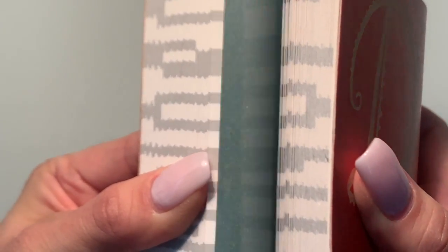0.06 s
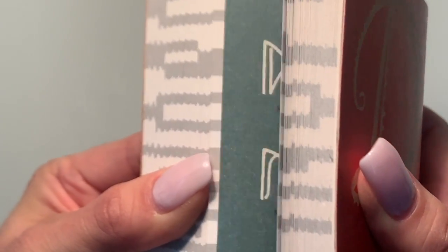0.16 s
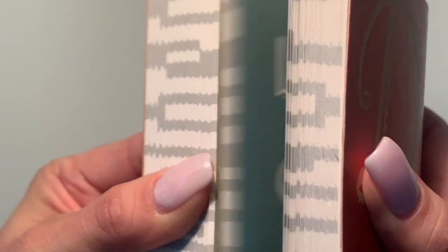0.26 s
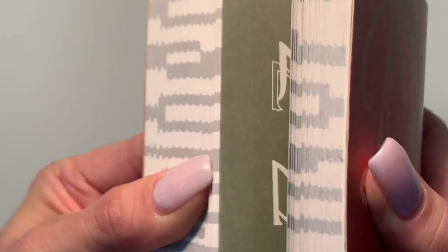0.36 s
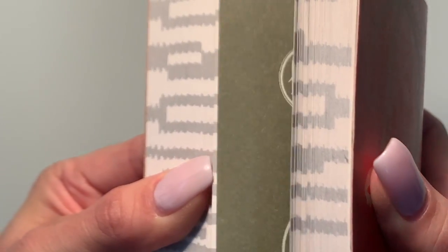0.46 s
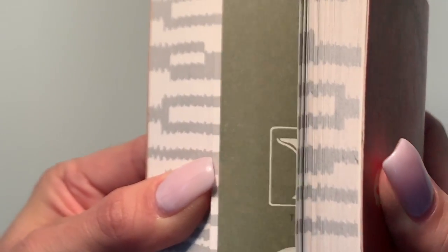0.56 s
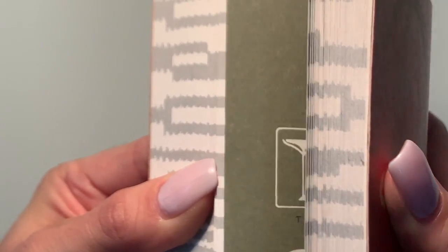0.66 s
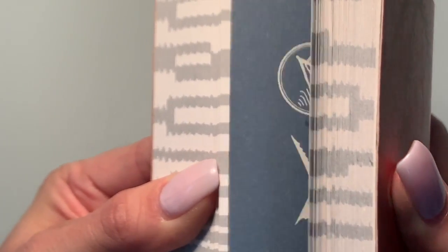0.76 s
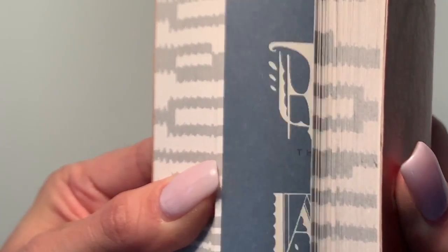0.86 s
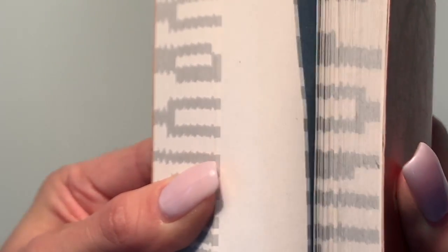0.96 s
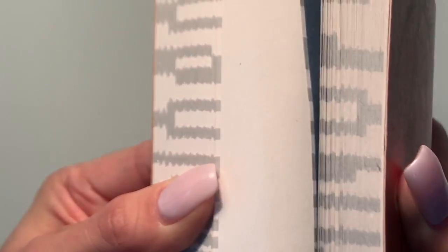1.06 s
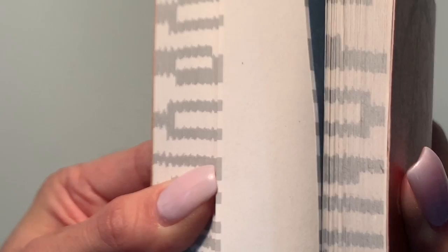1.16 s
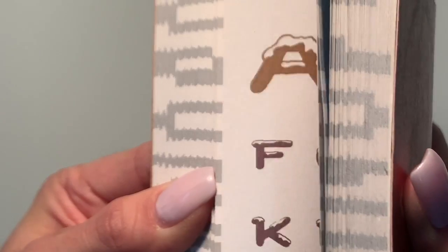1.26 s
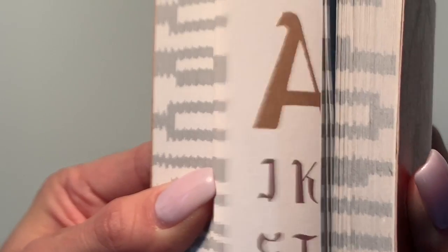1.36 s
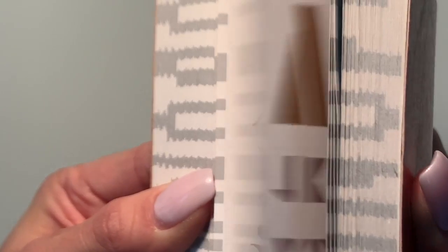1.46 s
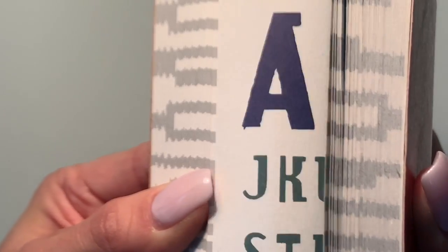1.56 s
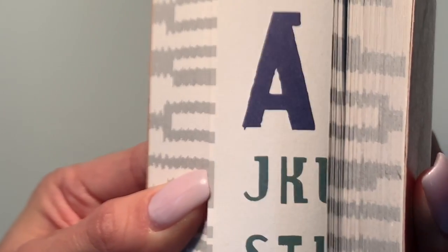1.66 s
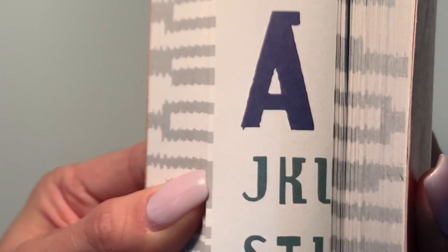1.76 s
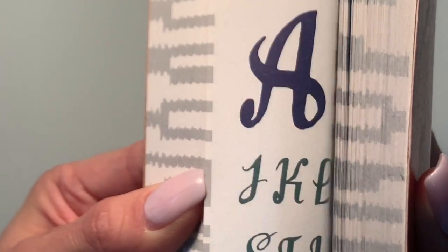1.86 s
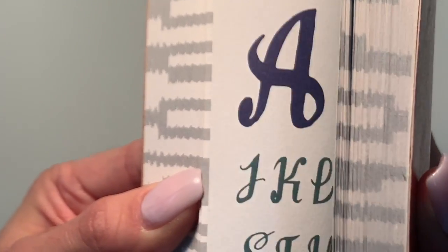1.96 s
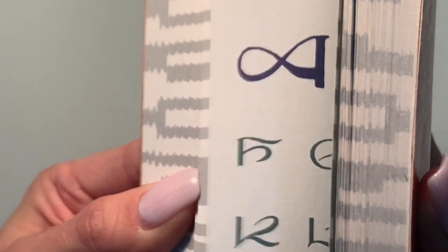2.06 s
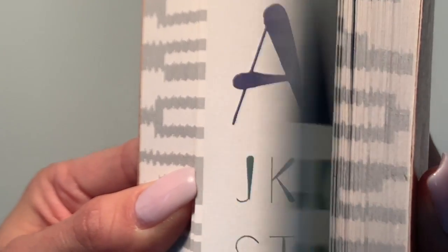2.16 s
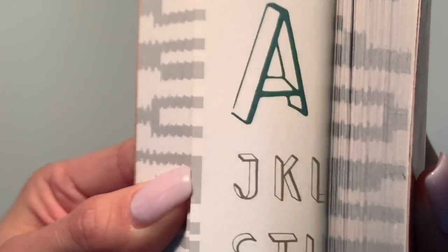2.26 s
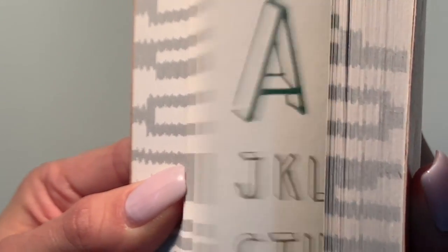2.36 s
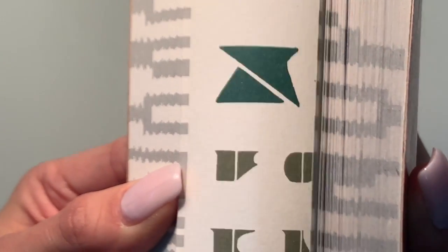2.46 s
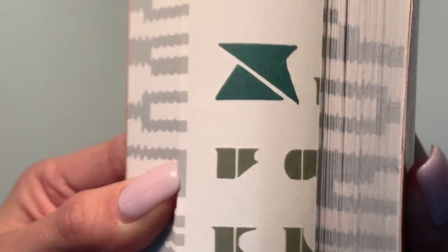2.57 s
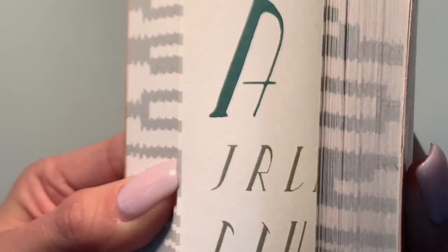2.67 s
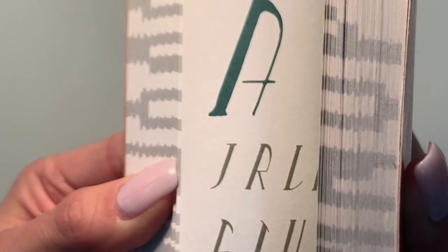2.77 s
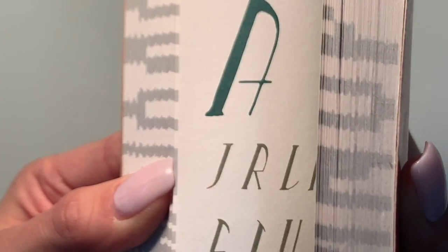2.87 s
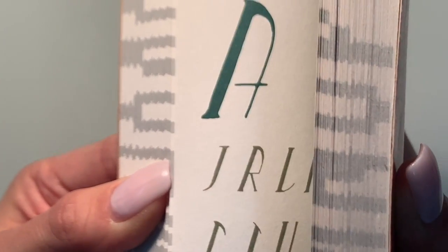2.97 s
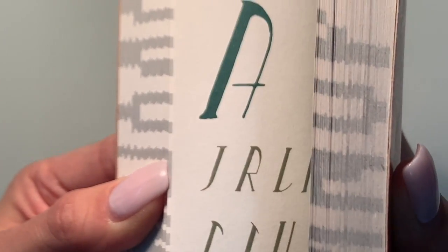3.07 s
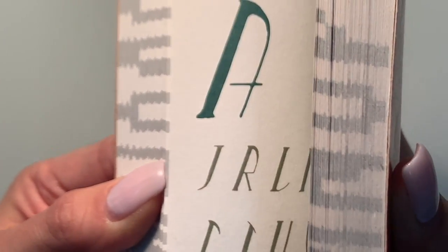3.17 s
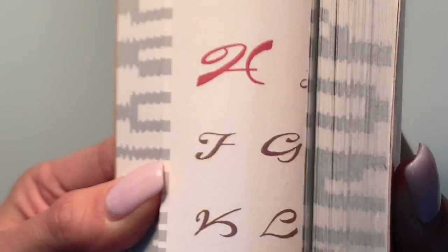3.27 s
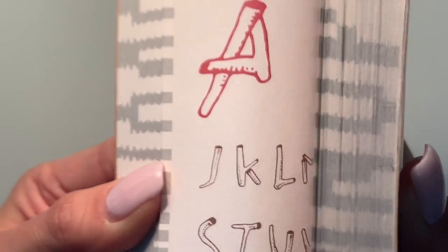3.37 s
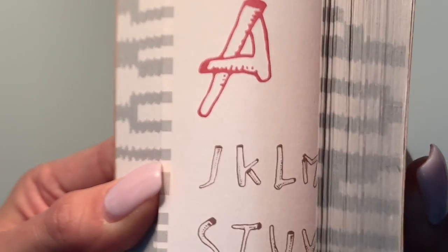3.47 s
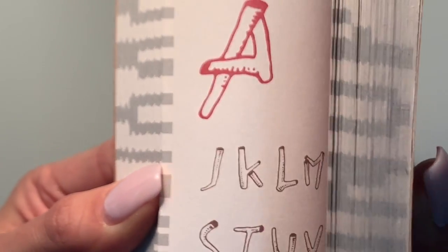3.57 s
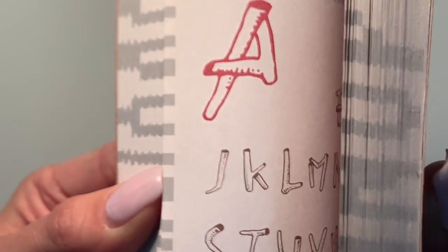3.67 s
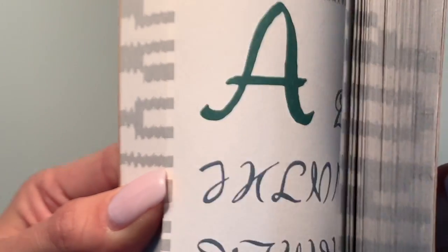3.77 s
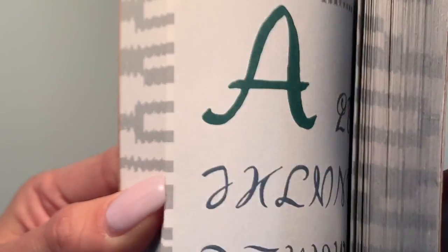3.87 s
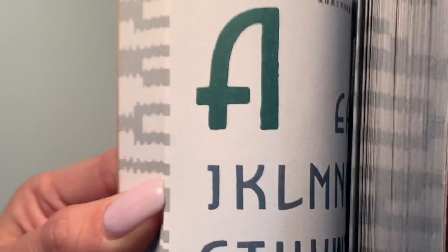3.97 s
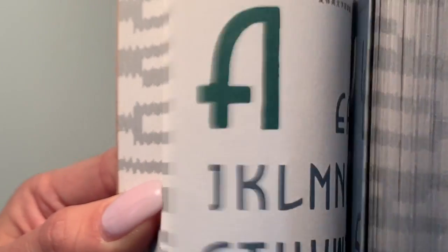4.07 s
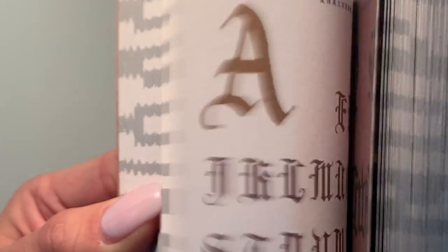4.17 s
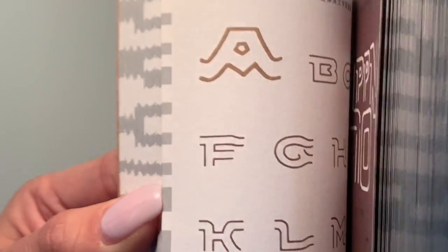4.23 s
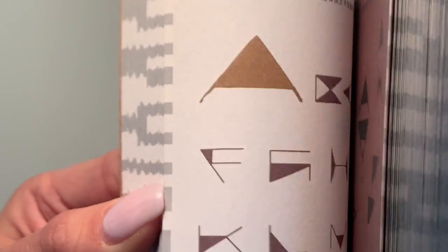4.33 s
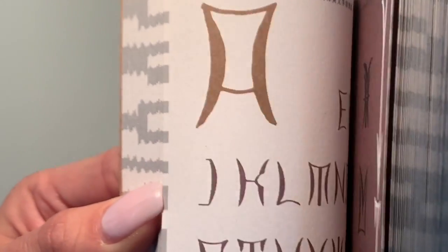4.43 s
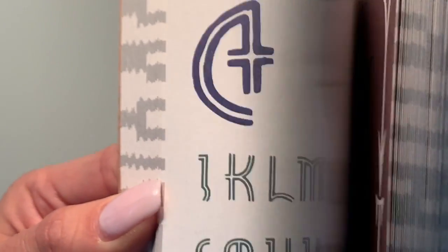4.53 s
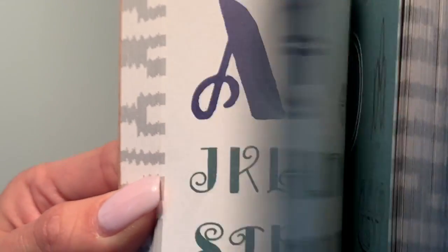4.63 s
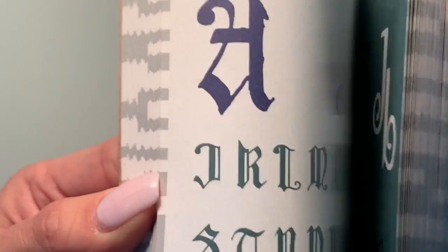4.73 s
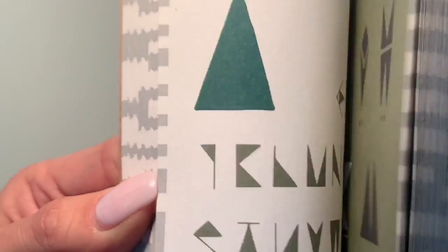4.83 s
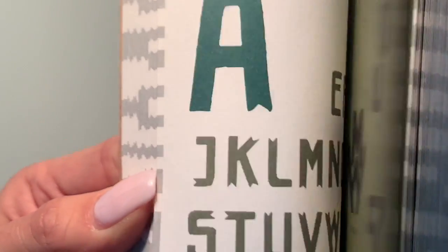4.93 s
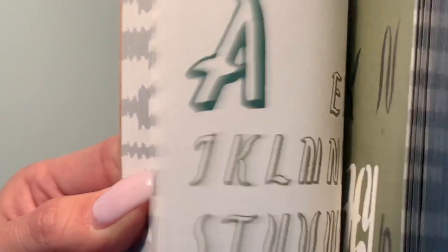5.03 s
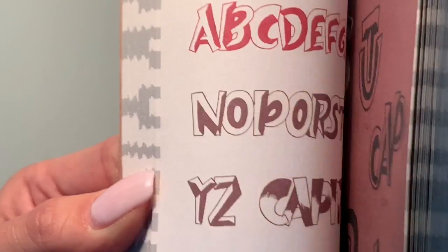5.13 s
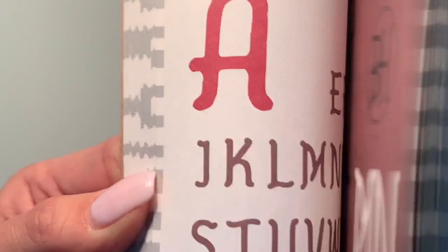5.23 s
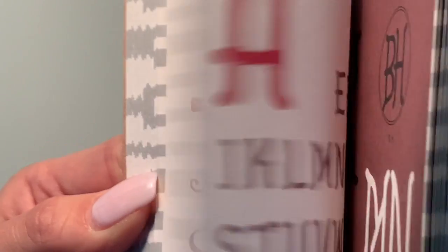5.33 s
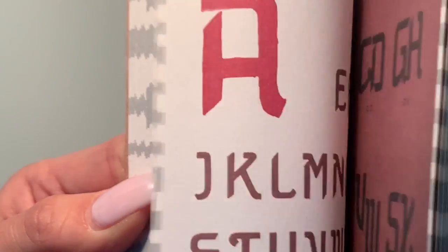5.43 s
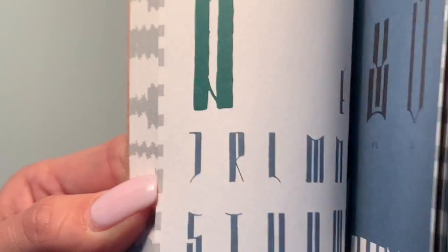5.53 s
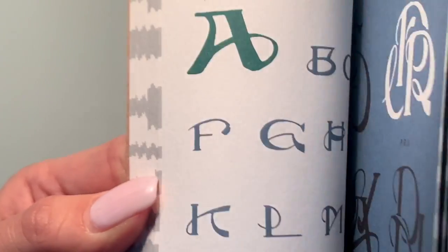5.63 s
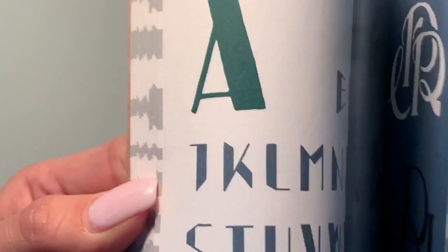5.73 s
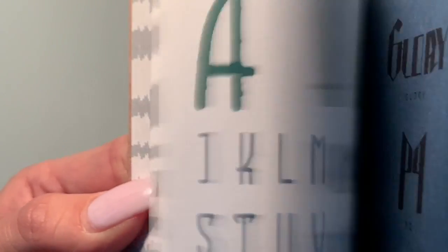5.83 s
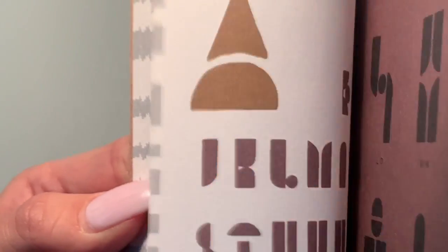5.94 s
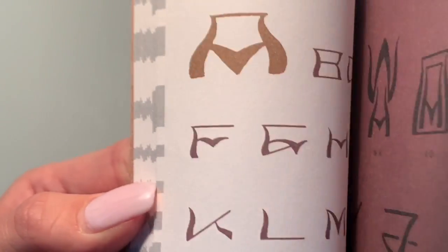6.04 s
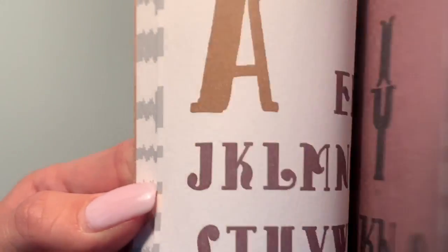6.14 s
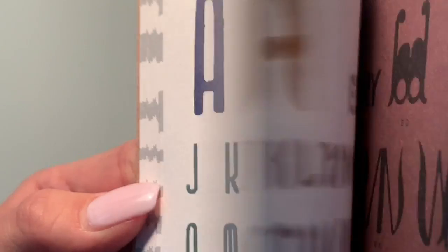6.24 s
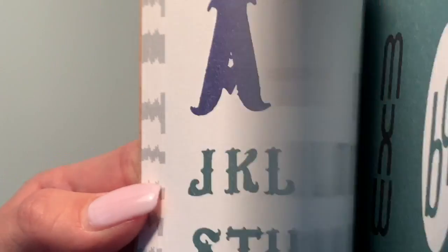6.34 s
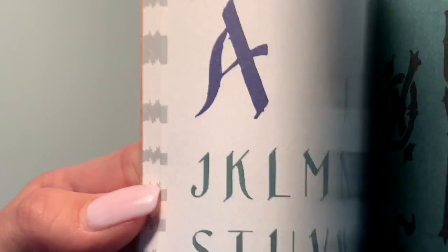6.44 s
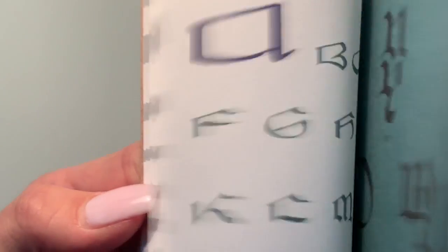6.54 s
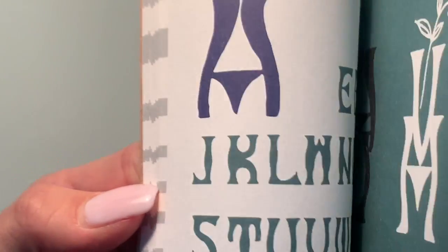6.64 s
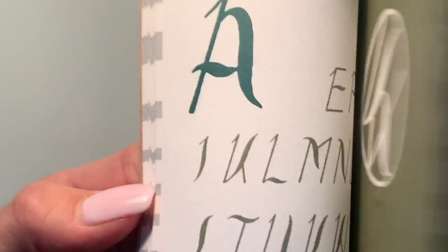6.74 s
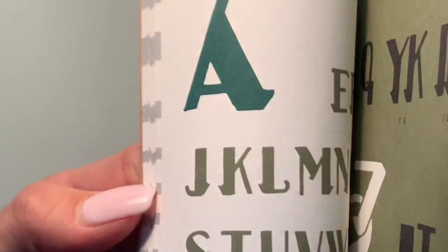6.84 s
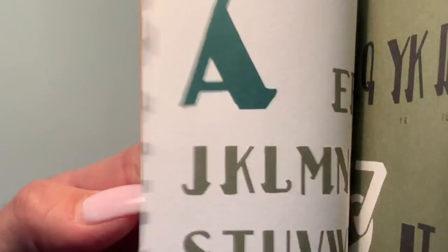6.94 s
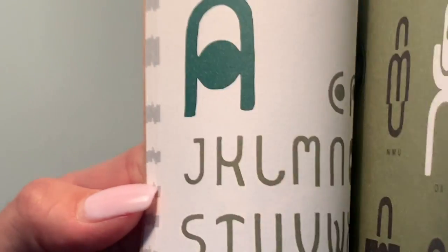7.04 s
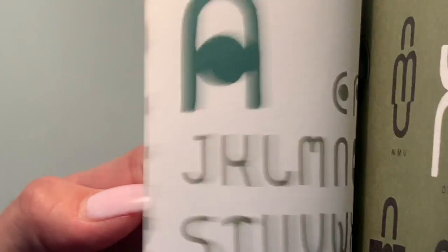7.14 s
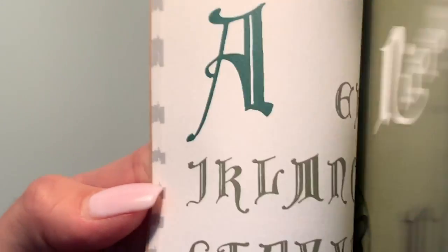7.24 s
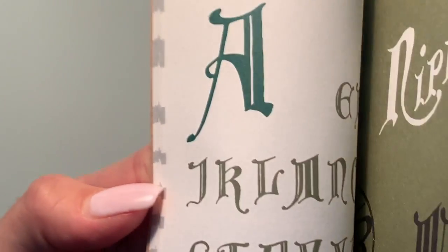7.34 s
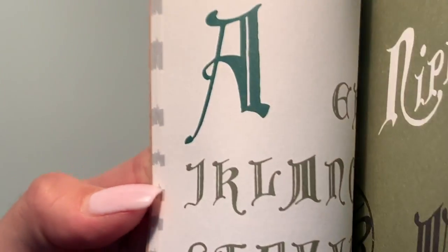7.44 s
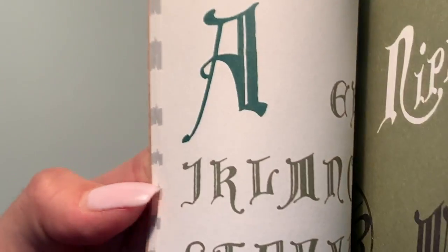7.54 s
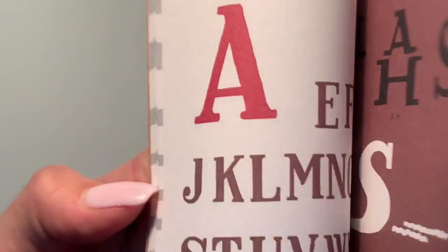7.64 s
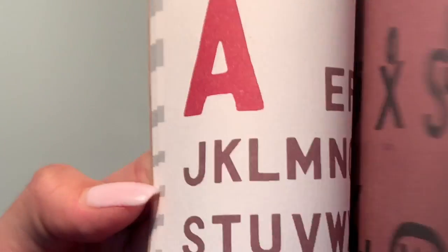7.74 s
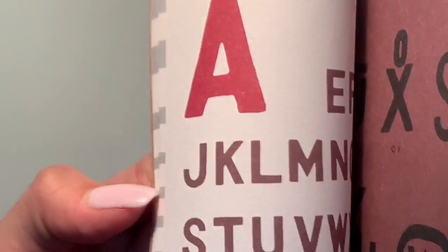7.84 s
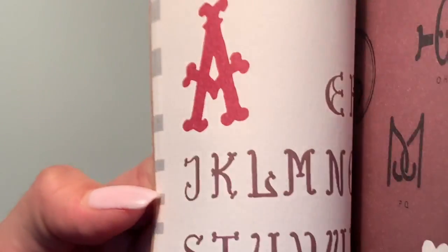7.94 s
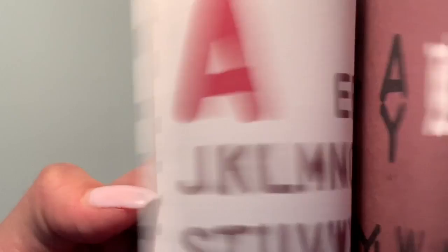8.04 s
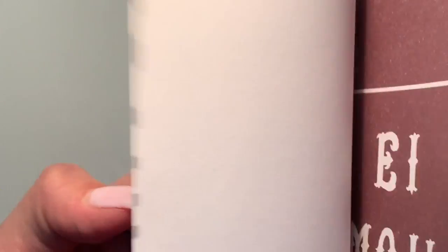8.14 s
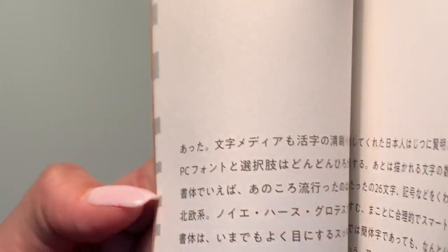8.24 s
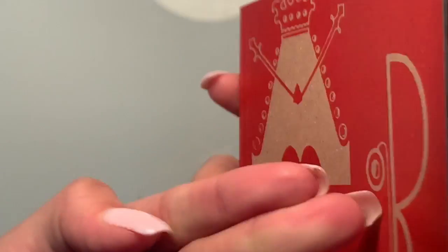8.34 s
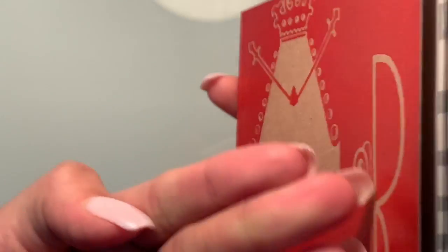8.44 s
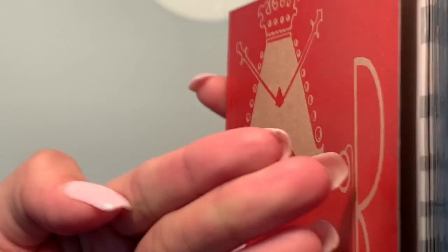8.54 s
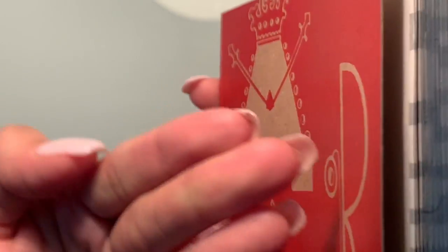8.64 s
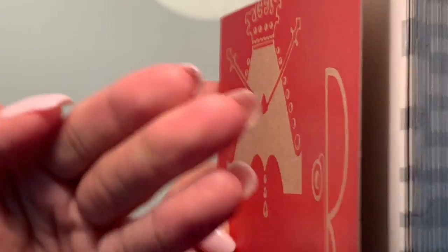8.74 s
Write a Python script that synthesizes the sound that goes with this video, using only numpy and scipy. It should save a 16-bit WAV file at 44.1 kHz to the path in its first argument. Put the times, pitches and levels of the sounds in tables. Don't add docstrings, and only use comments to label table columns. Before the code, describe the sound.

Very close in a quiet small room, a thumb lets pages of a thick soft-cover book slip away unevenly. Each scrapes, snaps and slaps the stack with a short papery rustle. Low grip thuds come near two and a half and three and a half seconds, then the flicking grows louder and busier. Near the end the book claps shut with a boomy thump, and the paper brushes briefly into stillness.

```python
import sys
import numpy as np
from scipy import signal
from scipy.fft import rfft, irfft, next_fast_len
from scipy.io import wavfile
from scipy.ndimage import uniform_filter1d

SR = 44100
rng = np.random.default_rng(int(sys.argv[2]) if len(sys.argv) > 2 else 0)


def waveform_to_disk(signal):
    frames = np.transpose(np.atleast_2d(signal))
    scaled = np.clip(frames, -1, 1) * 32767
    samples = np.round(scaled).astype(np.int16)
    wavfile.write(sys.argv[1], SR, samples)


def level_to_linear(level):
    exponent = np.asarray(level, float) / 20
    return 10 ** exponent


N = 388080

# frequency in Hz, level in dB per Hz.
ROOM_TONE = [(18, -38), (30, -8), (55, 5), (81, -25), (174, -9.5), (364, -31), (1500, -40.5), (2900, -39.5),
             (4500, -42.5), (6200, -52), (8740, -52), (13300, -44.5), (16000, -70)]
ROOM_TONE_DB = -61.5
# time in seconds, level in dB.
AIR_LEVEL = [(0, -53), (1.85, -61), (2.05, -47), (2.45, -53), (2.7, -75), (3.3, -53.5), (4.1, -59),
             (4.8, -56), (6, -58.5), (7.6, -67), (8.31, -65), (8.4, -39), (8.55, -65)]
FAN_DB, FAN_DELAY_S = 7.5, 0.0034

# release in seconds, slap in
# dB, edge hiss in dB over slap, lead of the catch in ms, catch in dB.
CAUGHT = [(0.042, -43.5, -10, 13.5, -43), (0.0892, -42, -1.5, 9.8, -42),
          (0.1464, -42.5, -3.5, 16.8, -41.5), (0.2373, -43.5, -7, 11.3, -39.5),
          (0.2995, -43, -14, 9.7, -44.5), (0.3465, -46, 3, 4.8, -42.5), (0.4108, -47.5, -1, 4.3, -42),
          (0.499, -44, -1, 11, -47.5), (0.6196, -44.5, 1.5, 14.5, -38.5),
          (0.7156, -41.5, -8, 17.8, -44.5), (0.7989, -49, -2.5, 9.6, -40.5),
          (0.9247, -42, 0, 17.2, -43), (0.9447, -39, -18.5, 12.7, -41),
          (1.155, -43.5, 1.5, 19.2, -42), (1.2657, -42, -1.5, 25.4, -45.5),
          (1.342, -37.5, -4, 33, -42.5), (1.407, -37, -4.5, 21, -43),
          (1.4946, -39.5, -1.5, 38, -46.5), (1.5596, -40, -4.5, 34, -46.5),
          (1.677, -44, 6, 47, -44.5), (1.8721, -34.5, -11.5, 57.3, -49),
          (2.0256, -35.5, -8.5, 67, -47.5), (2.4019, -36, -6.5, 49, -55),
          (2.622, -39.5, -13, 17.2, -42.5),
          (3.2598, -35, -15, 9.2, -32), (3.3781, -29, -2, 13, -38.5), (3.7275, -32.5, -8, 12.6, -41.5),
               (3.925, -37.5, -2.5, 10, -33.5), (4.1242, -39, -5, 7.2, -43.5),
               (4.2153, -35.5, -6, 7.7, -35), (4.308, -37.5, 1, 33.8, -41),
               (4.4013, -35.5, -5.5, 19.5, -39.5), (4.5609, -34.5, -3, 11.3, -36.5),
               (4.6564, -38.5, 0, 42.2, -37.5), (4.7456, -38, 2.5, 17, -42), (4.8211, -39.5, 0, 27, -40.5),
               (4.834, -39.5, -6, 6.4, -40.5), (4.888, -35.5, -2, 11.4, -41.5),
               (4.935, -36.5, -0.5, 6.3, -38), (4.9957, -33, -1, 7.3, -37.5), (5.0758, -38, 4, 11, -39.5),
               (5.1167, -35.5, 3, 5.5, -40.5), (5.2444, -34.5, -4, 6.5, -42),
               (5.2206, -37.5, 1.5, 13.3, -40), (5.4212, -34, -1, 7.7, -40.5), (5.6201, -35.5, -16, 6, -47),
               (5.876, -36.5, -3.5, 7, -49), (6.0176, -35.5, -3, 7.3, -48)]
# time in seconds, slap in dB,
# rustle in dB over slap, edge hiss in dB over slap.
FREE = [(0.4179, -45, 8, -5), (0.555, -43.5, 1, -2.5), (.5629, -43.5, 6.5, 0.5),
        (0.728, -42, 7, -3.5), (0.8127, -39.5, 7, -1), (0.8234, -43, 4, -3), (0.83, -42, -2.5, 0),
        (0.836, -43.5, 0, -3.5), (0.932, -50.5, -3, -5), (0.9525, -43, 6, 3), (1.334, -49, -5.5, -7),
        (1.555, -50.5, 1.5, 6.5), (3.7216, -35.5, 6.5, -2), (1.5787, -31, -0.5, -10),
        (2.109, -37, -0.5, -5), (2.1841, -36, -1.5, -6.5), (2.2737, -35.5, -3.5, -9.5),
        (2.419, -38.5, 1.5, -5), (2.431, -35, -0.5, -7), (3.6448, -41, -0.5, 5),
        (3.7335, -37, 5.5, -5.5), (3.8538, -43.5, 3.5, 5),
        (4.003, -48, 4, 10), (4.1093, -40, -13.5, -4.5), (4.157, -43, -7, 6), (4.474, -47.5, -2, 8),
             (5.367, -36.5, -4, -4), (5.6029, -37, -5.5, 0), (5.848, -38.5, -7, -2), (5.483, -37, -4, 2),
             (5.7421, -36.5, -2.5, 2.5), (5.9819, -36.5, -6, -1), (6.1225, -39, -3.5, 2),
             (6.1952, -36, -4.5, -1.5), (6.2583, -42, 1.7, 2), (6.3561, -37.5, -3, 1.5),
             (6.4496, -41.5, -3, 5.5), (6.5281, -37.5, -7.5, 1.5), (6.577, -39.5, -3.5, -1),
             (6.7332, -39.5, -7.5, -2), (6.801, -38.5, -4, -4.5), (6.9814, -42, -1, 6.5),
             (7.173, -41.5, -5, 0), (7.234, -44, 2, 6), (7.6161, -48, -4, 2.5), (7.7098, -39.5, -22, -11),
             (7.7364, -45, -12.5, -1.5), (7.8965, -50.5, -6, 3), (8.024, -46, -4.5, -1.5),
             (8.0707, -46, -5, -0.5), (8.178, -54, 2.5, 7.5)]
# time in seconds, level in dB.
BITES = [(.034, -52.5), (0.7968, -40.5), (2.6148, -42.5), (3.3733, -30.5), (5.0655, -38), (5.109, -41),
         (0.0738, -46), (0.219, -46.5), (0.283, -46), (0.338, -48.5), (0.404, -47.5), (0.549, -51),
         (5.352, -42.5), (5.5761, -48), (5.836, -45.5)]
# time in seconds, level in dB.
BRUSHES = [(3.8025, -58), (.843, -54), (3.447, -64), (3.555, -67.5), (7.625, -59), (.966, -56),
           (1.357, -58), (2.0164, -47.5), (2.2007, -51), (2.345, -61.5), (3.3009, -57.5), (4.2631, -49.5),
           (5.6273, -52), (5.9347, -57.5)]
# time in seconds, slap in dB, edge hiss in dB over slap.
LANDINGS = [(1.942, -45.5, -40), (2.513, -64, 5.5), (2.5648, -53.5, -23), (3.474, -57, -20),
            (3.5482, -54.5, -20), (3.7146, -42, -10), (3.9157, -44, -12), (6.136, -47, -26.5),
            (6.3298, -45, -32.5), (6.386, -46.5, -21.5), (6.702, -50, -27), (6.748, -41, -24.5),
            (6.7684, -38, -12), (6.9163, -38, -9.5), (6.9661, -40, -23), (7.0388, -35.5, -12),
            (7.057, -42.5, -25), (7.1586, -40, -31), (7.265, -41, -31.5), (7.5634, -54, -25),
            (7.6524, -39.5, -32), (7.6843, -39.5, -35.5), (7.9192, -37.5, -32.5), (7.935, -49, -23),
            (7.9888, -33.5, -28), (8.0146, -34.5, -25), (8.0374, -33.5, -24), (8.255, -36, -33)]
# time in seconds, level in dB.
LONE_LANDINGS = [(2.228, -51), (2.5983, -52), (5.91, -54), (2.062, -49), (5.655, -52.5), (6.057, -54),
                 (6.4164, -48), (6.4687, -46.5), (3.419, -54), (7.575, -60), (7.695, -53.5), (7.704, -50.5)]
# time in seconds, length in ms, slap in dB, rustle in dB, edge hiss in dB.
CLAP = [
    (8.3074, 2.26, -22.5, -36.5, -34),
    (8.3278, 1.4, -26.5, -32.5, -22),
    (8.3572, 1.3, -46.5, -41.5, -37),
    (8.3793, 2.5, -36, -57, -60.5),
    (8.5261, 1.4, -60, -74.5, -72.5),
]
# time in seconds, drag of a catch in ms,
# drag of a release in ms, rustle of a release in dB over slap.
GRIP = [
    (0, 1.5, 2.2, 0),
    (1.2, 1.87, 2.66, 0),
    (2.7, 4.1, 2.3, -3.5),
    (3.3, 2.55, 1.3, -3.5),
    (4.6, 3.6, 1.62, -2.5),
    (6, 4.46, 2.54, -3.5),
]

CATCH_SNAP, RELEASE_SNAP, FREE_SNAP = 0.48, 1.6, 1.4
CATCH_SLAP_DB, CATCH_RUSTLE_DB = -4, -7
CATCH_CREEP = 0.16
FREE_MS = 2.99
QUICK_S, QUICK_MS = 0.02, 1.27
BITE_MS = 1.46
BRUSH_MS, BRUSH_SLAP_DB, BRUSH_RUSTLE_DB = 2.4, -11.5, -5.5
LANDING_MS, LANDING_RUSTLE_DB = 2, -24.5

# frequency in Hz, width in Hz, level in dB.
SLAP_MODES = [(1265, 305, 5), (1847, 670, -1.5), (2350, 220, -3.5)]
# time in seconds, lowest mode in dB,
# middle mode in dB, knock of the stiff stack in dB.
POCKET = [(0, -3, 3.5, -4), (1.2, -2, 1.5, -8.5), (2.6, 0, 0.5, -6.5), (3.4, -3, 1, -5.5),
          (4.2, 1.5, 1, -13), (5.1, 2, 4, -22), (5.9, -3.5, 2, -26), (6.5, -1, -1.5, -19),
          (8.2, 0.5, -0.5, -18), (8.3, 4, -10, -14)]
# time in seconds, ring in dB,
# lean towards the low rustle in dB.
CURL = [(0, -19.5, -3), (.8, -16.5, 0), (1.4, -8.5, -2.5), (2.4, -11.5, 0.5), (3.3, -3.5, 0),
        (3.8, -13, -0.5), (4.5, -12, 0), (5.2, -18.5, 2), (6.4, -23, 0), (7.6, -9, -2.5), (8.1, -12, -1),
        (8.3, -5, 1)]
# time in seconds, boom in dB over slap.
STACK = [
    (0, -5),
    (3, -14.5),
    (6, -12.5),
    (7, -5),
    (8.8, -0.5),
]
# lower edge in Hz, upper edge in Hz.
KNOCK_HZ = [(700, 1000), (2450, 3400)]
RUSTLE_HZ, HISS_HZ = (3450, 7400), (7900, 16500)
CURL_HZ, CURL_WIDTH_HZ = 3945, 350
BOOM_HZ, BOOM_WIDTH_HZ = 298, 530
TICK_HZ, TICK_WIDTH_HZ = 1343, 210
LANDING_SPREAD_DB, LANDING_EDGE_DB = 1.5, -22
PLOP_HZ, PLOP_WIDTH_HZ, PLOP_DB, PLOP_LATENESS = 430, 320, 1.5, 2.2
PLOP_SLIP_DB = -2.5

# time in seconds, peak in dB, pitch in Hz,
# length in cycles, polarity with strength.
THUDS = [(2.0263, -32.5, 110, 0.85, 0.72), (2.3, -25.5, 68.2, 0.87, 0.47), (2.61, -33, 162, 0.86, 0.79),
         (2.6203, -16, 81.2, 1.12, 0.46), (3.515, -30.5, 92, 0.33, -1.35), (3.537, -27, 57.7, 0.88, 0.63),
         (3.579, -18, 72.5, 0.54, 0.48), (3.908, -41, 130, .6, -1.4), (3.921, -32, 118.5, 0.27, -1.9),
         (3.935, -36, 80, 1.1, 1.5), (4.116, -35, 82, 0.7, 0.48), (4.73, -34, 73, 1.3, 0.61),
         (5.0337, -42.5, 57.6, 1.2, -1.2), (5.268, -35, 76.5, 0.58, 0.59), (5.4083, -36, 67.4, 1.4, -0.58),
         (6.202, -38, 63.5, 0.8, -1.2), (8.3085, -23.5, 467, 1.5, 0.96), (8.322, -22.5, 214.6, 0.66, 1),
         (8.329, -16.5, 944, 1.4, -1.9), (8.3367, -9, 291, 1.08, -1.24), (8.341, -18.5, 74.2, 0.8, 0.75),
         (8.341, -25, 290, .8, 1.4), (8.322, -26, 75.1, .6, -0.16), (8.3715, -31, 345, 1.3, 1.3),
         (8.3941, -23, 120.6, .8, 0.8), (8.402, -26, 89.5, .8, 0.51), (8.416, -31.5, 84.9, .8, 0.7),
         (8.436, -35, 70, .9, -0.76)]
# time in seconds, level in dB, half length in ms.
STIR = [
    (3.215, -70.5, 13),
    (2.607, -55.5, 9),
    (3.43, -71.5, 25),
]
SETTLE_S, SETTLE_DB, SETTLE_DB_PER_S, SETTLE_LENGTH_S = 8.3, -51, 124, 0.2
# frequency in Hz, level in dB, decay time T60 in seconds.
COVER_RUMBLE = [(102, -39.5, .3), (150, -47, .38), (222, -40, 0.39), (320, -35, 0.32), (460, -48, 0.35)]
COVER_S = 8.345

# frequency in Hz, T60 in seconds.
ROOM_T60 = [(100, .3), (300, .3), (2000, .28), (12000, .2)]
ROOM_DB, WALL_S, WALL_DB = -20, 0.0093, -15.5
ROOM_TILT = 0.28
SHUT_ROOM_DB = -2.5
# frequency in Hz, left in dB, right in dB, likeness from 0 to 1,
# phase of the right port in rad.
PORTS = [(29.8, -4.5, -4.5, 0.9, -4), (330, -1.8, -3, 1, 1.24), (581, 0, -1.5, 0, -1),
         (1085, -1, -6.5, 0.93, -4.5), (1488, -2, -8.5, 0.6, -3), (1978, 7, 3.5, 0.9, -8),
         (2800, 7, 9.5, 0.48, -9.5), (4130, -0.5, -3, 1, -11), (4600, -1.5, 0, 0.02, -11.5),
         (5730, 4, 5, 1, -12), (8310, 1.1, 0.5, 0.84, -10), (9520, 3, 3, 0.5, -7),
         (14250, 1.5, 1.5, 0.83, 1.15), (15600, -5.5, -4, 0.6, 3.5), (16000, -20.5, -19.5, .8, 2.5),
         (16800, -24, -23.5, .8, 4.5)]
# frequency in Hz, width in Hz, depth from 0 to 1.
NOTCHES = [(2945, 210, 0.6), (9000, 310, 0.3), (11690, 650, 0.9), (15000, 300, 0.8)]
OWN_AIR_DB, OWN_HUM_DB = -21.5, -23.5

SIZE = next_fast_len(N + SR)
HZ = np.fft.rfftfreq(SIZE, 1 / SR) + 1e-3


def rms_one(x):
    return x / np.sqrt(np.mean(x ** 2) + 1e-20)


def in_time(rows, column=1):
    columns = np.transpose(rows)
    return np.interp(np.arange(N) / SR, columns[0], columns[column])


def at_hz(points, hz):
    table_hz, values = np.transpose(points)
    return np.interp(np.log(hz), np.log(table_hz), values)


def shaped(x, response):
    return irfft(rfft(x, SIZE) * response, SIZE)[..., :N]


def band(x, hz):
    sos = signal.butter(3, hz, "band", fs=SR, output="sos")
    return signal.sosfilt(sos, x) * np.sqrt(SR / 2 / (hz[1] - hz[0]))


def resonance(x, hz, width_hz):
    r = np.exp(-np.pi * width_hz / SR)
    zeros = np.sqrt((1 - r * r) / 2) * np.array([1, 0, -1])
    poles = [1, -2 * r * np.cos(2 * np.pi * hz / SR), r * r]
    return signal.lfilter(zeros, poles, x)


def smooth_noise(samples):
    return rms_one(uniform_filter1d(rng.standard_normal(N), size=samples))


def add(track, s, shape, lead):
    i = round(s * SR) - lead
    skip = max(0, -i)
    track[..., i + skip:i + shape.shape[-1]] += shape[..., skip:N - i]


def floor():
    return level_to_linear(ROOM_TONE_DB) * rms_one(shaped(rng.standard_normal((2, N)), level_to_linear(at_hz(ROOM_TONE, HZ))))


def slips():
    grip_s, catch_ms, release_ms, rustle_db = np.transpose(GRIP)
    rows = []
    for s, db, edge, lead_ms, catch in CAUGHT:
        rows.append((s - lead_ms / 1000, np.interp(s, grip_s, catch_ms), CATCH_SNAP,
                     catch + CATCH_SLAP_DB, catch + CATCH_RUSTLE_DB, catch))
        rows.append((s, np.interp(s, grip_s, release_ms), RELEASE_SNAP,
                     db, db + np.interp(s, grip_s, rustle_db), db + edge))
    for s, db, rustle, edge in FREE:
        quick = any(0 < s - row[0] < QUICK_S for row in rows)
        rows.append((s, QUICK_MS if quick else FREE_MS, FREE_SNAP, db, db + rustle, db + edge))
    for s, db in BITES:
        rows.append((s, BITE_MS, CATCH_SNAP, db + CATCH_SLAP_DB, db + CATCH_RUSTLE_DB, db))
    for s, db in BRUSHES:
        rows.append((s, BRUSH_MS, CATCH_SNAP, db + BRUSH_SLAP_DB, db + BRUSH_RUSTLE_DB, db))
    for s, db, edge in LANDINGS:
        rows.append((s, LANDING_MS, 1, db, db + LANDING_RUSTLE_DB, db + edge))
    for s, length_ms, *db in CLAP:
        rows.append((s, length_ms, 1, *db))
    return sorted(rows)


def air():
    lumps = smooth_noise(1500)
    passing = np.zeros(N)
    for s, *_ in slips():
        add(passing, s + FAN_DELAY_S, np.hanning(1200), lead=600)
    gusts = rng.standard_normal(N) * level_to_linear(4 * np.clip(lumps, -2, 1.3))
    stray_gusts = gusts * rng.choice([-1, 1], N)
    gusts = np.array([gusts, stray_gusts]) * level_to_linear(FAN_DB * np.minimum(passing, 1))
    return level_to_linear(in_time(AIR_LEVEL)) * rms_one(band(gusts, (32, 105)) + 0.47 * band(gusts, (140, 330)))


def fibres(rough_db, clump_db):
    catch, clumps = smooth_noise(12), smooth_noise(70)
    crackle = level_to_linear(np.minimum(rough_db * catch + clump_db * clumps, 6))
    return rms_one(rng.standard_normal((2, N)) * crackle)


def contact(creep_db=-12, creep=2.17, bridge_db=-9, linger_db=-19, linger_ms=5,
            whisper_db=-22, whisper_ms=9):
    power, snaps, ticks = np.zeros((3, N)), np.zeros((3, N)), np.zeros(N)
    ms = np.arange(-1800, 1800) * 1000 / SR
    shortest_ms, rise, fall = 0.8, 0.65, 0.35
    before, earlier = -1, np.zeros((3, 1))
    for s, length_ms, snap, *db in slips():
        drag = np.clip(length_ms - shortest_ms, 0.3, 4)
        core = np.exp(np.where(ms < 0, ms / (rise * drag), -ms / (fall * drag)))
        warning = CATCH_CREEP if snap == CATCH_SNAP else 1
        creeping = warning * level_to_linear(2 * creep_db) * drag * np.exp(ms / (creep * drag + 0.16))
        flutter = level_to_linear(2 * linger_db) * np.exp(-ms / linger_ms)
        skirt = np.where(ms < 0, creeping, flutter)
        gap_ms, before = 1000 * (s - before), s
        dull = np.clip((db[0] - max(db[1:]) - 9) / 6, length_ms == LANDING_MS, 1)
        slap_amp = level_to_linear(np.array(db[:1]))
        gain = level_to_linear(np.array(db))[:, None] * [[1 - 0.85 * dull], [1], [1]]
        whisper = warning * level_to_linear(2 * whisper_db) * np.exp(ms / whisper_ms) * (ms < 0)
        whisper = whisper * np.minimum(1, level_to_linear(-52.0) / gain) ** 2 * drag * [[0.3], [0.7], [1]]
        rubbing = level_to_linear(2 * bridge_db) * (ms > -gap_ms) * (ms < 0) * (gap_ms < 17)
        add(power, s, np.minimum(gain, earlier) ** 2 * rubbing, lead=1800)
        earlier = gain
        add(power, s, gain ** 2 * (core * 3.49 / (drag + 0.5) + skirt + whisper), lead=1800)
        add(snaps, s, snap * gain / (2.1 * drag + 0.99), lead=0)
        add(ticks, s, dull * slap_amp, lead=0)
    for s, db in LONE_LANDINGS:
        add(ticks, s, level_to_linear(np.array([db])), lead=0)
    return power, snaps, ticks


def patchy(x, hz, tilt_db, lean_db=0):
    tilt = lean_db + tilt_db * smooth_noise(600)
    middle = np.sqrt(hz[0] * hz[1])
    return band(x * level_to_linear(tilt), (hz[0], middle)) + band(x * level_to_linear(-tilt), (middle, hz[1]))


def swoop(lateness, knee_hz, early_s):
    return np.exp(-2j * np.pi * (lateness * np.log(1 + HZ / knee_hz) - HZ * early_s))


def slap_pockets(drive, snaps):
    push = level_to_linear(-3.5) * drive[0] + level_to_linear(14.5) * snaps[0]
    pocket_db = [in_time(POCKET, 1), in_time(POCKET, 2), 0]
    slap = 0
    for k, (hz, width_hz, db) in enumerate(SLAP_MODES):
        slap = slap + (-1) ** k * level_to_linear(db + pocket_db[k]) * resonance(push, hz, width_hz)
    return band(slap, (650, 2800)) * level_to_linear(-12.0)


def stack_knock(drive, snaps):
    knock = level_to_linear(in_time(POCKET, 3)) * (drive[1] + level_to_linear(10.5) * snaps[1])
    return level_to_linear(-2.5) * band(knock, KNOCK_HZ[0]) + level_to_linear(-6) * band(knock, KNOCK_HZ[1])


def paper_rustle(drive, snaps):
    scrape = drive[1] + level_to_linear(9.0) * snaps[1] * np.array([[1], [-1]])
    rustle = level_to_linear(-4.5) * patchy(scrape, RUSTLE_HZ, tilt_db=2.5, lean_db=in_time(CURL, 2))
    ring = band(resonance(scrape, CURL_HZ, CURL_WIDTH_HZ), RUSTLE_HZ) / 3
    return rustle + level_to_linear(in_time(CURL, 1) + 9) * ring


def stack_boom(drive, snaps, ticks):
    push = level_to_linear(19.5) * snaps[0] + level_to_linear(-1.0) * drive[0, 0] - level_to_linear(14.5) * ticks
    push = level_to_linear(in_time(STACK)) * push
    return level_to_linear(-14.5) * band(resonance(push, BOOM_HZ, BOOM_WIDTH_HZ), (120, 900))


def flat_landings(ticks):
    ticks_early = -np.roll(ticks, -30)
    bright = level_to_linear(LANDING_SPREAD_DB * np.sin(np.arange(N) / 517))
    pop = resonance(ticks_early, TICK_HZ, TICK_WIDTH_HZ)
    pop = pop - level_to_linear(-7.5) * resonance(ticks_early * bright, 2300, 500)
    pop = level_to_linear(8.5) * band(band(pop, (600, 2600)), (400, 3100)) / 3.6
    return pop + level_to_linear(LANDING_EDGE_DB) * band(ticks_early * bright, (2300, 6500))


def plops(snaps, ticks):
    full = level_to_linear(LANDING_SPREAD_DB * np.sin(np.arange(N) / 731))
    push = level_to_linear(PLOP_SLIP_DB + in_time(STACK)) * snaps[0] - ticks * full
    plop = level_to_linear(PLOP_DB) * band(resonance(push, PLOP_HZ, PLOP_WIDTH_HZ), (200, 900))
    return shaped(plop, swoop(PLOP_LATENESS, knee_hz=61.74, early_s=0.00353))


def pages():
    power, snaps, ticks = contact()
    drive = np.sqrt(power)[:, None] * fibres(rough_db=4, clump_db=2.8)
    blow = slap_pockets(drive, snaps) + stack_boom(drive, snaps, ticks)
    blow = shaped(blow, swoop(1.4926, knee_hz=61.03, early_s=0.00139))
    hiss = level_to_linear(-3.5) * patchy(drive[2] + level_to_linear(13.5) * snaps[2], HISS_HZ, tilt_db=2.5)
    paper = blow + plops(snaps, ticks) + stack_knock(drive, snaps) + paper_rustle(drive, snaps) + hiss
    return paper, flat_landings(ticks)


def thuds():
    out = np.zeros(N)
    t = np.arange(-2000, 4000) / SR
    for s, db, hz, cycles, polarity in THUDS:
        turns = hz * t
        wave = np.cos(2 * np.pi * (turns - 0.14 * turns ** 2))
        add(out, s, polarity * level_to_linear(db) * np.exp(-(turns / cycles) ** 2) * wave, lead=2000)
    return out


def settling():
    now = np.arange(N) / SR
    t = now - SETTLE_S
    level = level_to_linear(SETTLE_DB - SETTLE_DB_PER_S * np.abs(t)) * (t > 0)
    level = level * np.clip((SETTLE_LENGTH_S - t) / 0.062, 0, 1)
    for s, db, half_ms in STIR:
        level = level + level_to_linear(db) * np.exp(-(1000 * (now - s) / half_ms) ** 2)
    return level * band(fibres(rough_db=2.0, clump_db=1.0), (1900, 14500))


def cover():
    t = np.arange(SR // 2) / SR
    hum = np.zeros(len(t))
    for hz, db, t60 in COVER_RUMBLE:
        hum += level_to_linear(db - 60 * t / t60) * band(rng.standard_normal(len(t)), (hz / 1.1, hz * 1.22))
    out = np.zeros(N)
    add(out, COVER_S, hum * np.minimum(t / 0.022, 1), lead=0)
    return out


def room(x):
    t, tail = np.arange(SR // 2) / SR, 0
    for hz in 90 * 2. ** np.arange(8):
        noise = band(rng.standard_normal((2, len(t))), (hz / 1.41, min(hz * 1.41, 16000)))
        tail = tail + hz ** ROOM_TILT * noise * level_to_linear(-60 * t / at_hz(ROOM_T60, hz))
    tail = tail * np.clip(t / 0.013, 0, 1)
    tail = tail / np.sqrt(np.sum(tail ** 2, axis=1, keepdims=True))
    wall = level_to_linear(WALL_DB) * np.exp(-2j * np.pi * HZ * WALL_S) / (1 + (HZ / 2600) ** 4)
    return shaped(x, level_to_linear(ROOM_DB) * rfft(tail, SIZE) + wall)


def ports(x):
    hz, left_db, right_db, alike, phase = np.transpose(PORTS)
    apart = np.minimum(HZ / 430, 1) ** 3
    alike = 1 - apart * (1 - np.clip(np.interp(HZ, hz, alike), 0, 1))
    turn = level_to_linear(np.interp(HZ, hz, right_db)) * np.exp(1j * apart * np.interp(HZ, hz, phase))
    left = shaped(x[0], level_to_linear(np.interp(HZ, hz, left_db)))
    right = shaped(x[0], turn * alike) + shaped(x[1], turn * np.sqrt(1 - alike ** 2))
    return np.array([left, right])


def notches():
    response = np.ones(len(HZ))
    for hz, width_hz, depth in NOTCHES:
        response *= 1 - np.clip(depth, 0, 1) / (1 + (2 * (HZ - hz) / width_hz) ** 2)
    return response


def scene():
    paper, landing = pages()
    knocks, quiet, (draught, stray) = thuds(), floor(), air()
    low_pass = signal.butter(2, 500, fs=SR, output="sos")
    stray = level_to_linear(OWN_AIR_DB) * stray + level_to_linear(OWN_HUM_DB) * signal.sosfilt(low_pass, quiet[1])
    own = band(quiet, (700, 7500)) * np.sqrt(6800 / (SR / 2))
    near = landing * [[1], [0.3]] + room(level_to_linear(1.5) * landing)
    shut = np.arange(N) > SETTLE_S * SR
    to_room = paper[0] * np.where(shut, level_to_linear(SHUT_ROOM_DB), 1) + knocks * np.where(shut, 1, 0.3)
    heard = paper + knocks + room(to_room) + draught + cover() + settling()
    at_ports = ports(heard + quiet - own) + near
    return shaped(at_ports, notches()) + 0.72 * own + stray * [[1], [-1]]


def roll_off(x):
    return signal.sosfilt(signal.butter(12, 16870, fs=SR, output="sos"), x)


def record(dry):
    return roll_off(dry)


dry = scene()
out = record(dry)
waveform_to_disk(out)
```